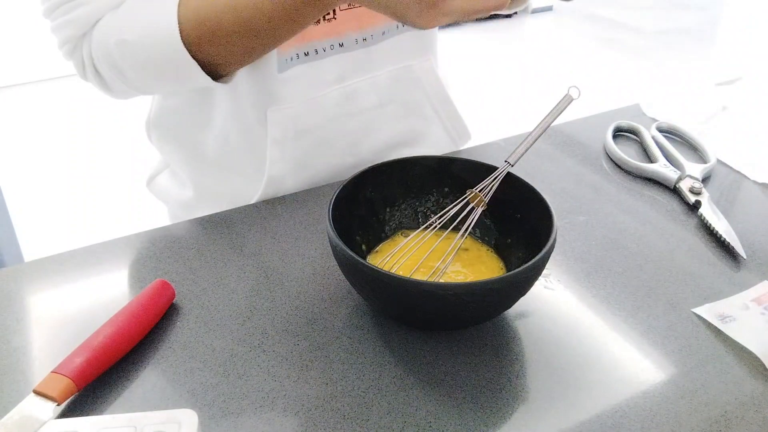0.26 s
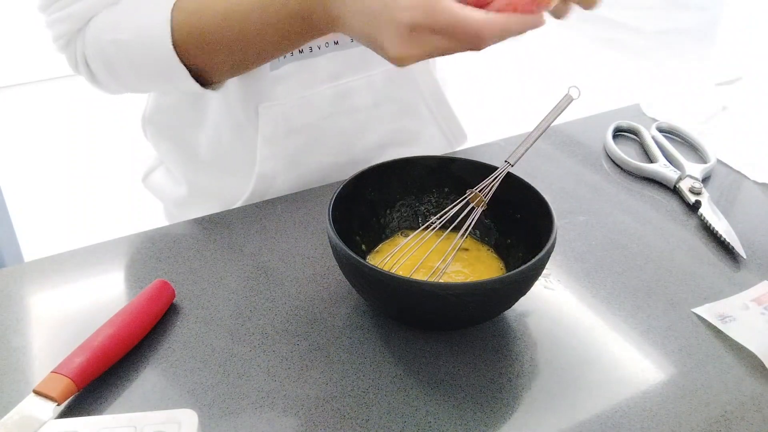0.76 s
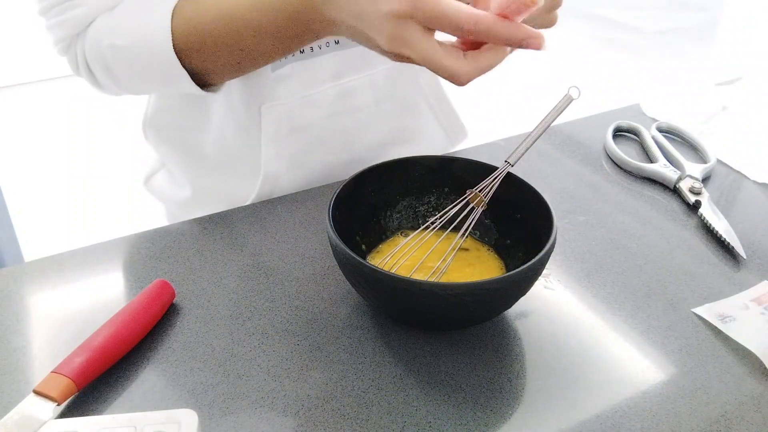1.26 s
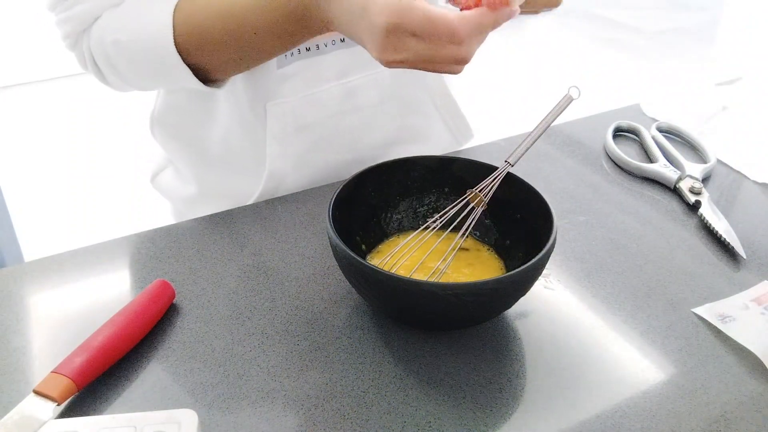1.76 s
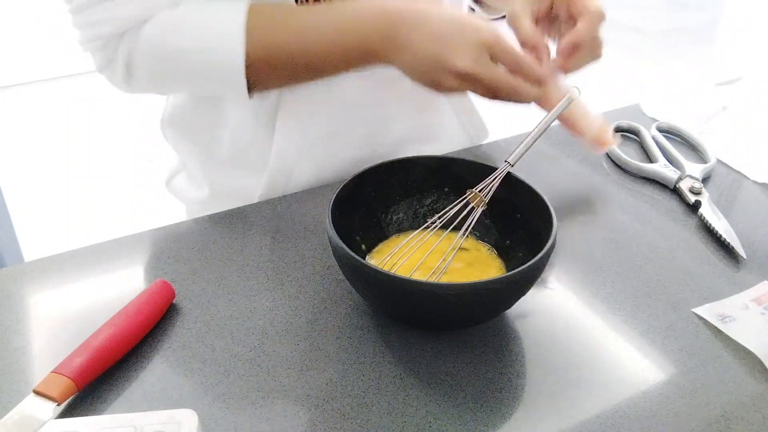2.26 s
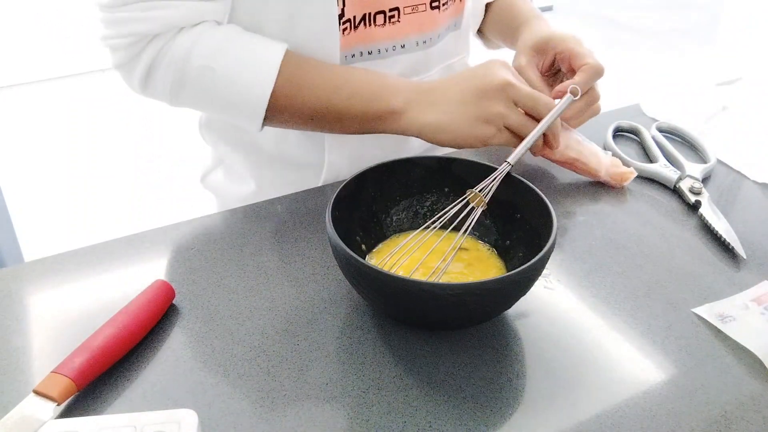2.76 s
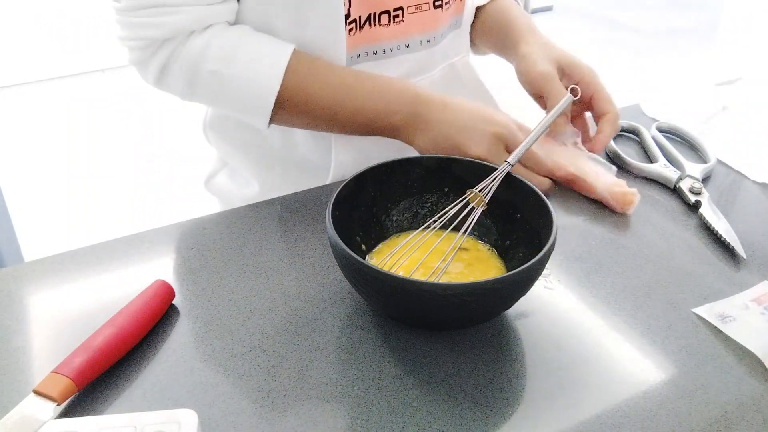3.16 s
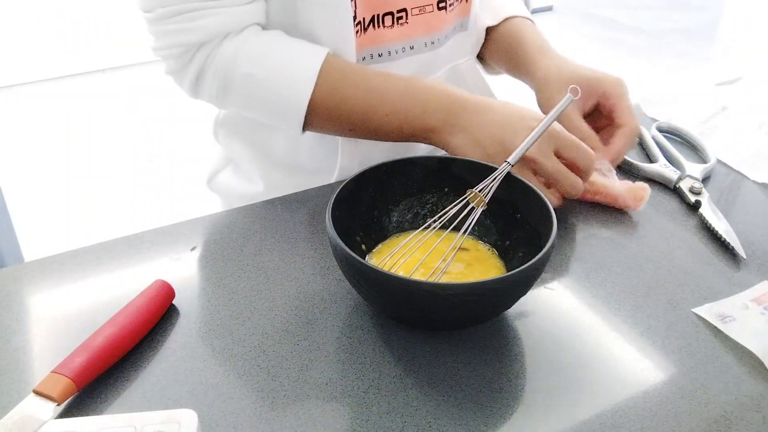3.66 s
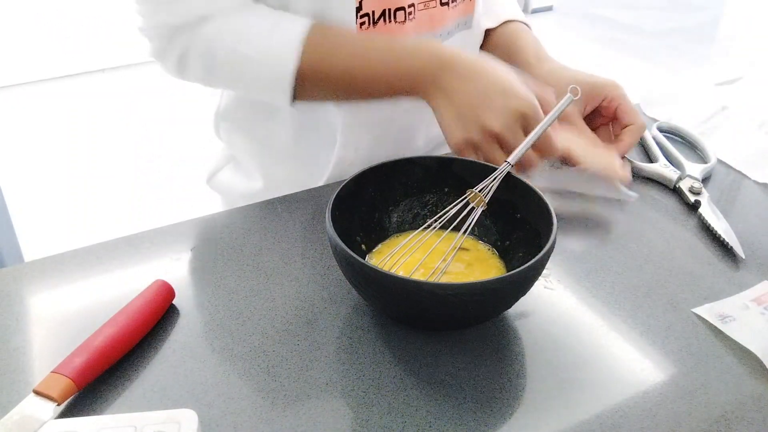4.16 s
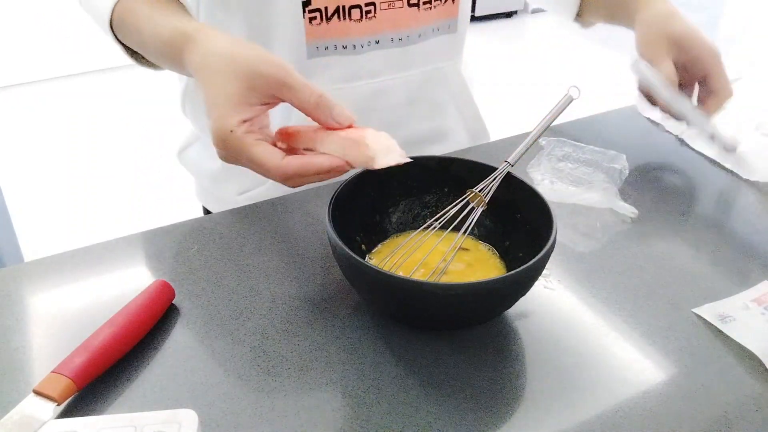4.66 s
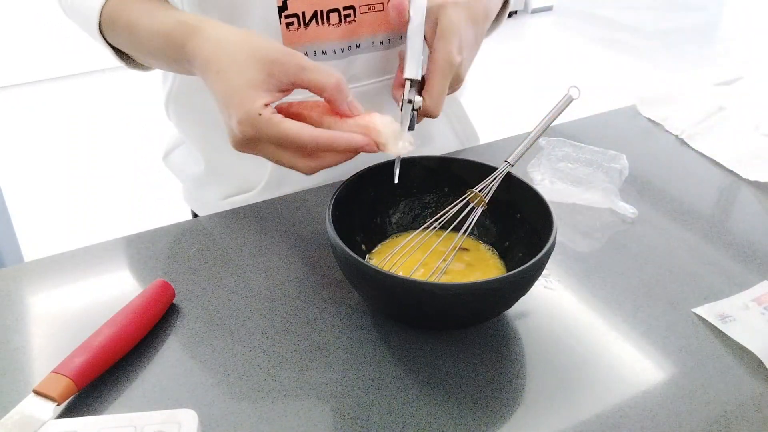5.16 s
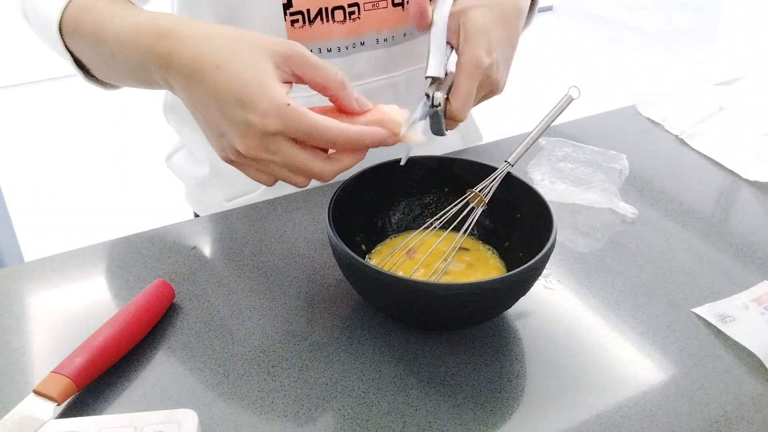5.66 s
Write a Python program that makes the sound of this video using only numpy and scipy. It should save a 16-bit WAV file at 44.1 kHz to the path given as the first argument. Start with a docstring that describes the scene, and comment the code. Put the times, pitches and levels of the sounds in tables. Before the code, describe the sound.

Light plastic crinkling grows into three short tearing rips, followed by metal shears knocking on stone and two bright scraping snips.

```python
"""Quiet kitchen, stone counter: fingers pick at the thin plastic sleeve of a crab stick, peel it in three pulls.
Sleeve: filtered grains crackle, rasp and flutter; buckling creases snap; fingertips knock on the counter.
Kitchen shears: knocks and drags on the stone ring the frame; two snips grind edge on edge, close and ring.
A dull thud lies under the first cut, a low room noise of uneven level under it all.
Sources but thud and room noise share a short room tail; both channels are identical."""
import sys
import numpy as np
from scipy import signal
from scipy.fft import rfft, irfft
from scipy.io import wavfile

SR = 44100
rng = np.random.default_rng(int(sys.argv[2]) if len(sys.argv) > 2 else 0)


def log_audio(samples):
    """Write samples as a 16-bit WAV file to the path given in sys.argv[1]."""
    # one column per channel
    frames = np.atleast_2d(samples).T
    # limit to full scale, then quantise
    limited = np.clip(frames, -1, 1)
    pcm = np.round(limited * 32767).astype(np.int16)
    wavfile.write(sys.argv[1], SR, pcm)


N = 261072
TIME = np.arange(N) / SR

# sleeve colour: f/Hz, gain/dB
SLEEVE_SPECTRUM = [(60, -51), (200, -25.5), (340, -9), (560, -1.5), (900, -9.5), (1300, -6.5), (1700, -6.5),
                   (2700, -5.5), (4400, -5), (6500, -5), (8000, -6.5), (9400, -14.5), (13000, -12),
                   (14500, -6), (16000, -10)]
# sleeve resonances: f/Hz, width/Hz, gain/dB
SLEEVE_RESONANCES = [(920, 47, 13), (2500, 220, 5), (3820, 370, 5.6), (5570, 670, 4.6), (6770, 180, 2.3),
                     (8800, 300, 6), (12030, 500, 14)]


def crinkle(crisp_db=0.0, fizz_db=0, rasp_db=-1, flutter_db=-1.5):
    """Light rubbing gives single crackles; a hard pull fuses them to a rip and shakes the whole sheet."""
    low_hz, flutter_top_hz, crisp_hz, fizz_hz = 1400, 1550, 3200, 9000
    crisp, fizz, rasp, flutter = np.sqrt(rubbing() + pulling())
    pull = crisp / crisp.max()
    sheet = colour(slips(pull), SLEEVE_SPECTRUM, SLEEVE_RESONANCES)
    patches = taut(creased(sheet, pull), pull)

    fizz_band = rms_one(cut(sheet, fizz_hz, "high", order=10))
    crisp_band = rms_one(cut(patches, [crisp_hz, fizz_hz], "band", order=4))
    rasp_band = rms_one(cut(patches, [low_hz, crisp_hz], "band", order=3))
    flutter_band = rms_one(cut(sheet, flutter_top_hz, "low", order=5))
    return (from_db(fizz_db) * fizz * fizz_band
            + from_db(crisp_db) * crisp * crisp_band
            + from_db(rasp_db) * rasp * rasp_band
            + from_db(flutter_db) * flutter * flutter_band)


# pulls: crest t/s, strain/s, rip half length/s, crackle level/dB
PULL_EVENTS = [(2.968, .03, .035, -34.5), (3.315, 0.082, 0.025, -25), (3.652, 0.085, .021, -28)]
STRAIN_DB, SETTLE_S = -15, .07   # strain level re rip; settling time


def pulling(fizz_db=-16.5, rasp_db=-0.26, rasp_follows=1.46, flutter_db=-11, flutter_follows=1.4,
            strain_rasp_db=-4, strain_flutter_db=-9):
    """Power of crackle, fizz, rasp, flutter in the pulls: the harder the rip, the more rasp and flutter."""
    usual_db = -30
    power = np.zeros((4, N))
    strain = from_db(STRAIN_DB + np.array([[0], [0], [strain_rasp_db], [strain_flutter_db]]))
    for s, strain_s, rip_s, db in PULL_EVENTS:
        effort_db = db - usual_db
        band_db = np.array([[effort_db],
                            [fizz_db + effort_db],
                            [rasp_db + rasp_follows * effort_db],
                            [flutter_db + flutter_follows * effort_db]])
        rip = swell(s, rip_s, rip_s)
        straining = strain * swell(s, strain_s, SETTLE_S)
        power += from_db(usual_db + band_db) ** 2 * (rip ** 2 + straining ** 2)
    return power


# finger rubs: t/s, length/s, crackle level/dB, rasp re crackle/dB
RUB_EVENTS = [(0.038, 0.094, -56, -27), (0.172, 0.034, -50.5, -7), (0.306, 0.15, -54.5, -13),
              (0.469, 0.054, -49, -13.5), (0.602, 0.043, -56.5, -15.5), (0.77, 0.01, -65, -14),
              (0.874, 0.027, -66, -6), (0.963, 0.071, -65, -18), (1.135, 0.098, -63, -5.5),
              (1.254, 0.14, -48.5, -5.5), (1.317, 0.026, -42, 2.5), (1.465, 0.014, -48.5, -7.5),
              (1.515, 0.022, -48.5, -8.5), (1.615, 0.027, -55, -0.5), (1.689, 0.1, -55.5, -4),
              (1.843, 0.039, -51, -7), (1.962, 0.11, -49.5, -12), (2.165, 0.2, -63, -35),
              (2.435, 0.023, -52, -16), (2.837, 0.044, -63.5, -22), (3.028, 0.092, -52, -3),
              (3.376, 0.079, -46.5, -9), (3.508, 0.12, -47.5, -5), (3.735, 0.028, -51.5, 0.5),
              (3.784, 0.025, -62, 7.5), (3.895, 0.11, -55, -4), (4.024, 0.078, -59.5, -3.5),
              (4.164, 0.039, -69.5, 0.5)]
LOOSE_FROM_S = 3.7   # sleeve is off and hangs slack


def rubbing(fizz_db=-15.0, fizz_follows=.65, flutter_db=-17, loose_fizz_db=-8, loose_flutter_db=8,
            waver_db=2.3):
    """Power of the same four in the rubs: light ones fizz more; the loose sleeve is duller and flaps."""
    usual_db = -52
    power = np.zeros((4, N))
    for s, length, db, rasp_db in RUB_EVENTS:
        loose = s > LOOSE_FROM_S
        fizz = usual_db + fizz_db + fizz_follows * (db - usual_db) + loose * loose_fizz_db
        flutter = db + flutter_db + loose * loose_flutter_db
        gain = from_db([[db], [fizz], [db + rasp_db], [flutter]])
        power += (gain * held(s, length)) ** 2
    return power * from_db(waver_db * drift(37)) ** 2


RUB_ATTACK_S, RUB_RELEASE_S, RUB_SAG_DB_PER_S = 0.011, .019, 10


def held(s, length):
    """A rub catches, sags a little while it lasts, and dies away."""
    t = np.maximum(TIME - s, 0)
    attack = 1 - np.exp(-(t / RUB_ATTACK_S) ** 2)
    release = np.exp(-np.maximum(t - length, 0) / RUB_RELEASE_S)
    return attack * release * from_db(-RUB_SAG_DB_PER_S * t)


def slips(pull, sparse_per_s=1500, dense_per_s=30000, tick_db=-6):
    """Fine grains thicken with the pull; lone ticks stand out only while the pull is light."""
    ticks_per_s, light_pull = 90, .15
    ticks = grains(ticks_per_s, spread_db=1.0) / (1 + (pull / light_pull) ** 2)
    return grains(sparse_per_s + dense_per_s * pull, spread_db=2.5) + from_db(tick_db) * ticks


def creased(x, pull, count=28):
    """Slack film patches change size under the fingers: resonances come and go; a hard pull holds them."""
    width_share, change_db, change_hz = .08, 8, 20
    slack, out = 1 / (1 + 2 * pull) ** 2, 0
    for k, hz in enumerate(np.geomspace(1200, 10000, count)):
        gain = from_db(change_db * slack * np.tanh(drift(change_hz)))
        out = out + (-1) ** k * gain * resonate(x, hz, width_share * hz)
    return out


def taut(x, pull, hz=3850, width_hz=500, ring_db=-1, half_pull=.1):
    """Film pulled taut rings at its main resonance."""
    return x + from_db(ring_db) * pull / (pull + half_pull) * resonate(x, hz, width_hz)


# creases that snap at set times, from loud cracks to faint ticks: t/s, peak level/dB, f/Hz
CREASE_SNAPS = [(0.0518, -38.5, 5330), (0.1268, -29.5, 5710), (0.381, -30, 7080), (0.4299, -28, 5700),
                (0.4708, -34, 6640), (0.572, -41, 5360), (0.7822, -39, 3670), (1.0086, -48, 4200),
                (1.0426, -36.5, 3700), (1.1143, -45.5, 3140), (1.2495, -28, 3000), (1.3274, -25.5, 3920),
                (1.4138, -29.5, 5450), (1.478, -28.5, 3870), (1.5226, -27.5, 3880), (1.6228, -36.5, 5200),
                (1.774, -31.5, 4200), (1.787, -34, 7090), (1.859, -29, 6600), (1.9898, -26, 5400),
                (2.0308, -23, 7160), (2.0761, -24, 5560), (2.211, -35.5, 5170), (2.3363, -31, 6100),
                (2.3994, -24, 5700), (2.5624, -49.5, 5460), (2.6952, -45.5, 5650), (2.814, -45.5, 5430),
                (2.8884, -39, 5970), (2.919, -23.5, 5400), (3.2518, -24, 3850), (3.282, -18, 2590),
                (3.5463, -24, 4000), (3.6328, -15, 4000), (3.7032, -18, 3750), (3.8102, -31.5, 5850),
                (4.1134, -34.5, 2560), (4.2293, -43, 3950)]


def snaps(level_db=-2, width_hz=2200, second_db=-3, top_hz=12000, scatter_db=-14, scatter_s=0.0029,
          lowest_hz=1500, again_db=-3, again_s=.003):
    """A crease buckles in two quick steps; rings at its own pitch and a narrower one nearby, via the sleeve."""
    lag_s, second_octaves, second_width_hz = .001, .4, 500
    out, creases = np.zeros(N), np.vstack([CREASE_SNAPS, small_snaps()])
    for (s, db, hz), (detune, wait) in zip(creases, rng.random((len(creases), 2))):
        buckle = contact(scatter_db, scatter_s)
        buckle[1 + int(wait * again_s * SR)] -= from_db(again_db)
        second_hz = hz * 2 ** (second_octaves * (2 * detune - 1))
        second = resonate(buckle, second_hz, second_width_hz)
        both = resonate(buckle, hz, width_hz) + from_db(second_db) * second
        crease = cut(both, [lowest_hz, top_hz], "band")
        add(out, s + lag_s, colour(crease, SLEEVE_SPECTRUM, SLEEVE_RESONANCES), db + level_db)
    return out


def small_snaps(over_rub_db=9, spread_db=3, centre_hz=6000, spread_octaves=1.0, light_extra=0.12, count=3):
    """Every rub also buckles a few creases, which stand out more in light rubs: rows as in CREASE_SNAPS."""
    usual_db = -52
    s, length, db, _ = np.repeat(RUB_EVENTS, count, axis=0).T
    when, size, pitch = 2 * rng.random((len(s), 3)).T - 1   # each -1..1
    snap_s = s + (length + 2 * RUB_RELEASE_S) * (when + 1) / 2
    peak_db = db + over_rub_db + light_extra * (usual_db - db) + spread_db * size
    return np.transpose([snap_s, peak_db, centre_hz * 2 ** (spread_octaves * pitch)])


# fingers bump the counter through the sleeve: t/s, peak level/dB, lowpass f/Hz
BUMP_EVENTS = [(3.096, -48, 700), (3.743, -37, 1200), (3.796, -45, 500), (3.850, -40, 402),
               (3.891, -49, 300), (3.971, -46, 500)]
# hollow answer: f/Hz, level/dB, t60/s
HOLLOW_MODES = [(366.7, 2, 0.081), (493, -3, 0.081), (681, 0, .06), (807.5, 6, 0.016), (1147, 1, 0.034),
                (2680, 5, 0.044)]


def bumps(level_db=0, fumble_db=-60, fumble_s=3.716, fumble_rise_s=0.06, fumble_fall_s=0.4):
    """Soft fingertips give short hollow knocks, and a blur of lesser ones as they free the sleeve."""
    out = np.zeros(N)
    for s, db, hz in BUMP_EVENTS:
        push = cut(contact(scatter_db=-16.0, scatter_s=0.0044), hz, "low", order=1)
        add(out, s, cut(ring(push, HOLLOW_MODES), 280, "high"), db + level_db)
    touches = cut(grains(250, spread_db=4.5), 1333, "low", order=1)
    fumble = cut(ring(touches, HOLLOW_MODES), 280, "high")
    return out + from_db(fumble_db) * swell(fumble_s, fumble_rise_s, fumble_fall_s) * rms_one(fumble)


# shears knock on the counter, click in the hand: t/s, peak level/dB, lowpass f/Hz
SHEAR_KNOCKS = [(4.353, -32, 3000), (4.365, -45, 900), (4.390, -41, 8050), (4.465, -30, 6000),
                (4.483, -30, 2000), (4.489, -26.5, 1520), (4.497, -51, 2000), (4.514, -34.5, 2470),
                (4.787, -62.5, 9120)]
# shears drag over the stone: crest t/s, rise/s, fall/s, level/dB
SHEAR_DRAGS = [(4.354, 0.012, 0.054, -49), (4.475, 0.016, 0.046, -37.5)]
# handles and frame: f/Hz, level/dB, t60/s
FRAME_MODES = [(411, -5, 0.052), (483, -3.5, 0.045), (728, -3.5, 0.051), (803, -15.5, 0.15),
               (1096, -14.5, 0.04), (1690, -11, 0.085), (2140, -6.5, 0.04), (2342, -10, 0.1),
               (2670, -4, 0.035), (3560, 1, 0.039), (3960, -0.5, 0.028), (4670, -5, 0.028),
               (5830, 1.5, 0.026), (6960, -0.5, 0.028), (8230, -2, .025)]
# contact noise on stone: f/Hz, gain/dB
STONE_SPECTRUM = [(200, -34.5), (420, -3.5), (600, -14), (720, -10.5), (1250, -16), (1750, -14.5),
                  (3000, -12), (3650, -12), (6000, -20.5), (9200, -24), (10500, -34.5), (15000, -38)]


def pick_up(knock_db=-1, crack_db=5, drag_db=-4, drag_ring_db=-3, lowest_hz=330):
    """The shears rock and drag on the counter; both set their frame ringing."""
    out = np.zeros(N)
    for s, db, hz in SHEAR_KNOCKS:
        blow = cut(contact(scatter_db=-13.5, scatter_s=0.0013), hz, "low", order=1)
        frame = ring(blow, FRAME_MODES) / len(FRAME_MODES)
        crack = from_db(crack_db) * colour(blow, STONE_SPECTRUM)
        add(out, s, frame + crack, db + knock_db)
    rub = colour(grains(3000, spread_db=2.5), STONE_SPECTRUM)
    pressure = sum(from_db(db + drag_db) * swell(s, rise, fall) for s, rise, fall, db in SHEAR_DRAGS)
    out += pressure * (rms_one(rub) + from_db(drag_ring_db) * rms_one(ring(rub, FRAME_MODES)))
    return cut(out, lowest_hz, "high", order=3)   # keeps the clatter free of bass


# blades close: t/s, swell/s, slide level/dB, stop peak level/dB
SNIP_EVENTS = [(5.174, 0.014, -44, -24.5), (5.659, 0.016, -39.5, -53)]
# steel sliding on steel: f/Hz, gain/dB
EDGE_SPECTRUM = [(300, -37), (1100, -18), (1550, -5), (2000, -20.5), (2350, -8.5), (2850, -22), (3250, 2.5),
                 (4500, -7), (5300, 4), (7000, 3), (7700, -5), (8800, -3), (9400, -12), (10500, -8),
                 (15500, -24)]
# clearest blade modes: f/Hz, level/dB, t60/s
BLADE_MODES = [(3460, -18, 0.2), (3747, -13, 0.21), (5184, -15, .17), (5500, -15, 0.162), (6200, -11, 0.13),
               (6330, -18, 0.2), (6840, -7, .12), (10640, -19, .15), (11850, -14, 0.172)]


def snips(release_s=0.0076, ring_db=-55, hiss_db=-8):
    """Edge grinds along edge ever harder until the blades meet their stop and ring out."""
    stop_lag_s = .003
    out, slide = np.zeros(N), rms_one(colour(grains(12000, spread_db=3.5), EDGE_SPECTRUM))
    for s, rise, slide_db, stop_db in SNIP_EVENTS:
        out += from_db(slide_db) * swell(s, rise, release_s, shape=2.2) * slide
        stop = colour(contact(scatter_db=-11, scatter_s=0.0018), EDGE_SPECTRUM)
        add(out, s + stop_lag_s, stop, stop_db)
    return out + from_db(ring_db) * ring(out, BLADE_MODES) + from_db(hiss_db) * hiss_tail(out)


def hiss_tail(x):
    """A bright, dense hissing tail follows each snip and dies away."""
    t60_s, band_hz = .28, [5000, 6700]
    t = TIME[:SR // 2]
    tail = rng.standard_normal(len(t)) * from_db(-60 * t / t60_s)
    return cut(signal.fftconvolve(x, tail / np.sqrt(np.sum(tail ** 2)))[:N], band_hz, "band", order=2)


# thud under the first cut, upper part first: lead/s, half length/s, f/Hz, level/dB
THUD_PARTS = [(0, 0.027, 170, -51.5), (0.018, 0.0035, 255, -53.5)]
THUD_S = 5.148


def thud():
    """A soft, nearly pure low bump: two swelling sines."""
    out = 0
    for lead, length, hz, db in THUD_PARTS:
        sine = np.sqrt(2) * np.sin(2 * np.pi * hz * TIME)   # rms 1
        out = out + from_db(db) * swell(THUD_S - lead, length, length) * sine
    return out


KITCHEN_T60_S = 0.21


def kitchen(x, dull_hz=8000, first_echo_s=0.0074):
    """Dense reflections start after the nearest wall and die away, a little dulled."""
    t = TIME[:SR // 2]
    tail = rng.standard_normal(len(t)) * from_db(-60 * t / KITCHEN_T60_S) * (t > first_echo_s)
    tail = cut(tail, dull_hz, "low", order=1)
    return signal.fftconvolve(x, tail / np.sqrt(np.sum(tail ** 2)))[:N]


# room noise colour: f/Hz, gain/dB
HUSH_SPECTRUM = [(25, -14), (80, -4.5), (140, -1), (290, 2), (420, -6.5), (950, 0), (1600, -8), (2400, -18),
                 (4000, -22), (6000, -37), (9000, -37.5), (15000, -46)]
# room noise resonances: f/Hz, width/Hz, gain/dB
HUSH_RESONANCES = [(143.4, 19, 12.5), (384, 110, 8.5), (906, 140, 0)]
# room noise course, before level_db: t/s, level/dB
HUSH_COURSE = [(0, -61.5), (.5, -59.5), (.8, -63), (1.4, -60), (2.35, -60), (2.75, -65.5), (3.3, -59.5),
               (4.1, -60.5), (5.0, -67.5), (5.3, -64.5), (5.92, -65.5)]


def hush(level_db=-2.0):
    """Dull air noise of the room: coloured noise on a slow level course."""
    noise = colour(rng.standard_normal(N), HUSH_SPECTRUM, HUSH_RESONANCES)
    return from_db(in_time(HUSH_COURSE) + level_db) * rms_one(noise)


def grains(per_s, spread_db):
    """Tiny slips at random moments and of uneven size; mean power 1 at any rate."""
    chance = np.clip(per_s / SR, 1e-4, 1)
    sizes = rms_one(from_db(spread_db * np.minimum(rng.exponential(1, N), 4)))
    signed = sizes * rng.choice([-1, 1], N)
    return signed * (rng.random(N) < chance) / np.sqrt(chance)


def contact(scatter_db, scatter_s, size=6000):
    """One click followed by a quickly dying scatter of smaller ones."""
    burst = from_db(scatter_db) * rng.standard_normal(size) * np.exp(-np.arange(size) / SR / scatter_s)
    burst[0] = 1
    return burst


def ring(x, modes):
    """Each mode answers a click with a dying sine."""
    out = 0
    for k, (hz, db, t60_s) in enumerate(modes):
        r, w = from_db(-60 / (t60_s * SR)), 2 * np.pi * hz / SR
        sine = signal.lfilter([0, np.sin(w)], [1, -2 * r * np.cos(w), r * r], x + 1e-18)
        out = out + (-1) ** k * from_db(db) * sine
    return out


def resonate(x, hz, width_hz):
    """A resonance with gain 1 on top."""
    r = np.exp(-np.pi * width_hz / SR)
    poles = [1, -2 * r * np.cos(2 * np.pi * hz / SR), r * r]
    return signal.lfilter(np.array([1, 0, -1]) * (1 - r * r) / 2, poles, x + 1e-18)


def colour(x, spectrum, peaks=(), size=4096):
    """Causal (minimum-phase) filter with the given spectrum, then raised resonances."""
    hz, db = np.transpose(spectrum)
    grid = np.maximum(np.fft.rfftfreq(size, 1 / SR), 1)
    cepstrum = irfft(np.log(from_db(np.interp(np.log(grid), np.log(hz), db))))
    cepstrum[1:size // 2] *= 2   # fold to minimum phase
    cepstrum[size // 2 + 1:] = 0
    x = signal.fftconvolve(x, irfft(np.exp(rfft(cepstrum))))[:len(x)]
    for peak_hz, width_hz, peak_db in peaks:
        x = x + (from_db(peak_db) - 1) * resonate(x, peak_hz, width_hz)
    return x


def cut(x, hz, kind, order=2):
    """Butterworth filter."""
    sos = signal.butter(order, np.clip(hz, 10, .45 * SR), kind, fs=SR, output="sos")
    return signal.sosfilt(sos, x)


def swell(s, rise, fall, shape=2.2):
    """A rounded rise and fall around time s."""
    out = np.zeros(N)
    near = slice(*np.searchsorted(TIME, [s - 5 * rise, s + 5 * fall]))
    t = TIME[near] - s
    out[near] = np.exp(-np.abs(t / np.where(t < 0, rise, fall)) ** shape)
    return out


def drift(corner_hz):
    """Smooth chance of rms 1: noise through two lowpass poles, at every 40th sample, joined by lines."""
    r = np.exp(-80 * np.pi * corner_hz / SR)
    noise = rng.standard_normal(N // 40 + 2002)
    slow = signal.lfilter([1], [1, -2 * r, r * r], noise)[2000:]   # drop the filter's start
    return np.interp(np.arange(N) / 40, np.arange(len(slow)), rms_one(slow))


def in_time(rows):
    """Join rows of (t/s, value) by straight lines."""
    return np.interp(TIME, *np.transpose(rows))


def add(out, s, sound, peak_db):
    """Place a sound at time s with the given peak."""
    start = round(s * SR)
    out[start:start + len(sound)] += (from_db(peak_db) * sound / np.abs(sound).max())[:N - start]


def from_db(db):
    """Decibels to gain."""
    return 10 ** (np.asarray(db) / 20)


def rms_one(x):
    """Scale to rms 1."""
    return x / np.sqrt(np.mean(x ** 2) + 1e-20)


def scene(sleeve_room_db=-17, pick_up_room_db=-18, snip_room_db=-11):
    """All sources and their reflections, the same in both channels."""
    sleeve = crinkle() + snaps() + bumps()
    clatter, cuts = pick_up(), snips()
    to_room = (from_db(sleeve_room_db) * sleeve
               + from_db(pick_up_room_db) * clatter
               + from_db(snip_room_db) * cuts)
    room = kitchen(to_room)
    return np.tile(sleeve + clatter + cuts + thud() + room + hush(), (2, 1))


CUTOFF_HZ = 15700


def record(dry):
    """The top is cut steeply: elliptic lowpass, 0.2 dB ripple, 80 dB stop."""
    return signal.sosfilt(signal.ellip(10, .2, 80, CUTOFF_HZ, fs=SR, output="sos"), dry)


dry = scene()
out = record(dry)
log_audio(out)
```